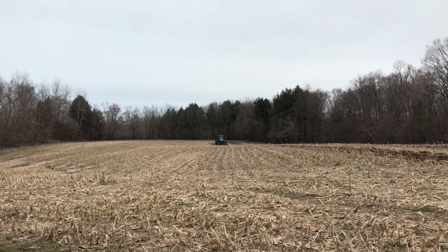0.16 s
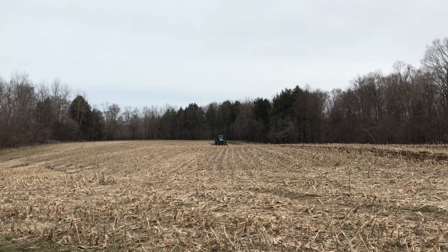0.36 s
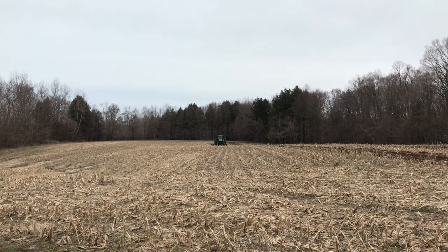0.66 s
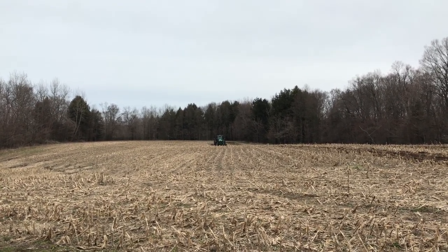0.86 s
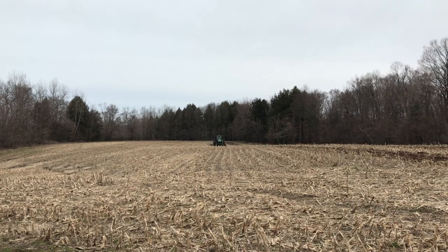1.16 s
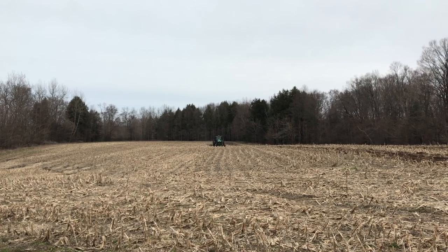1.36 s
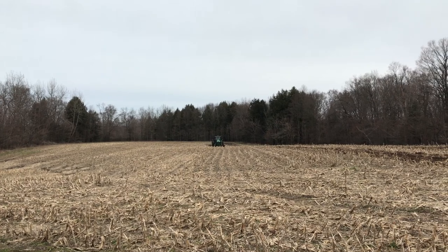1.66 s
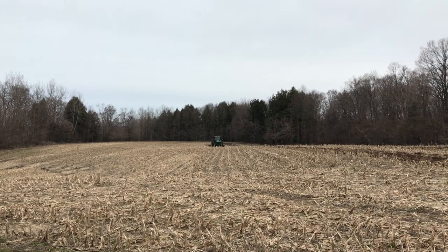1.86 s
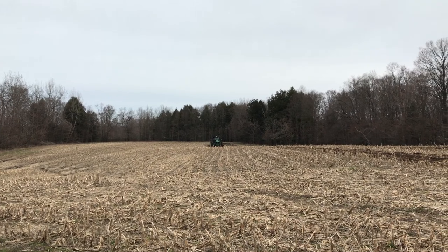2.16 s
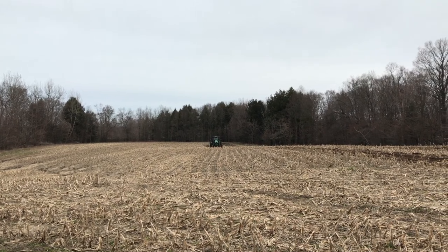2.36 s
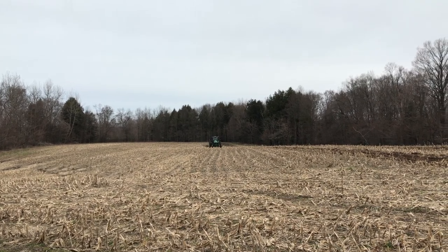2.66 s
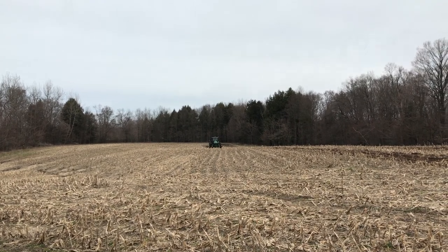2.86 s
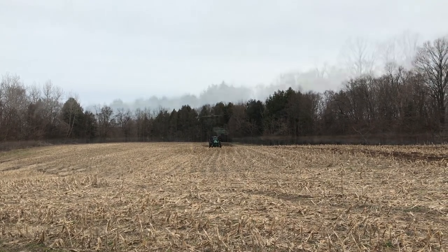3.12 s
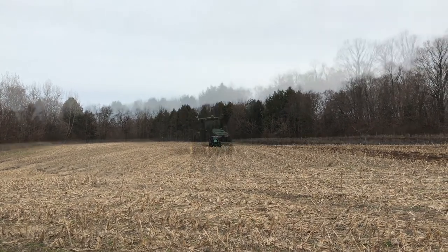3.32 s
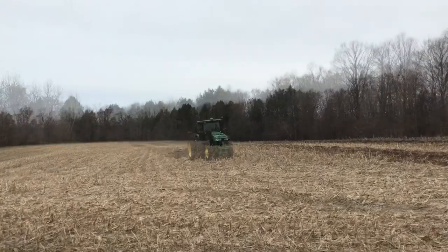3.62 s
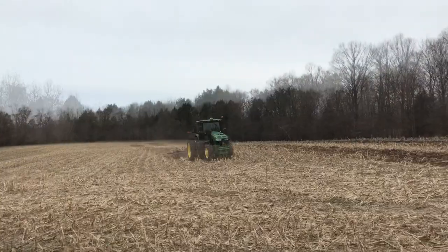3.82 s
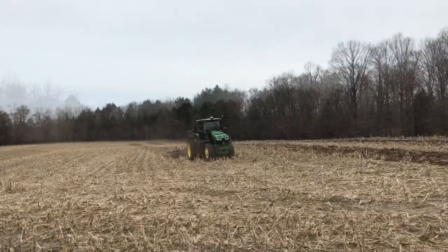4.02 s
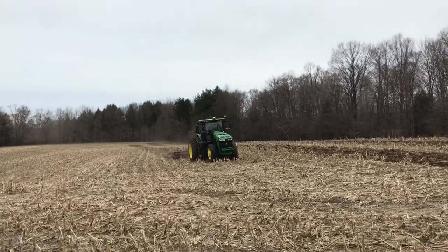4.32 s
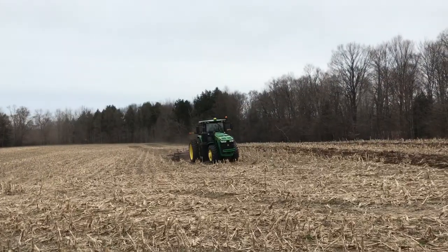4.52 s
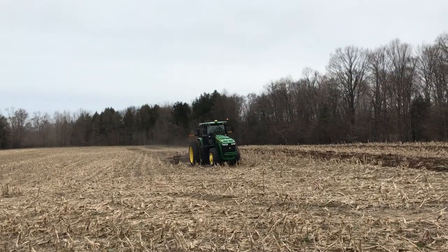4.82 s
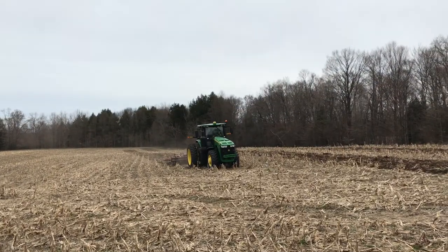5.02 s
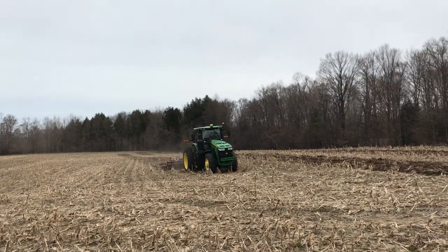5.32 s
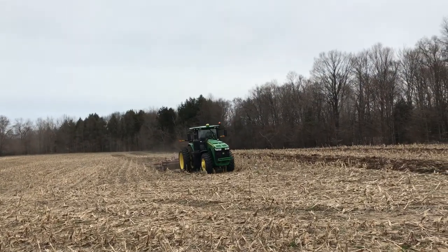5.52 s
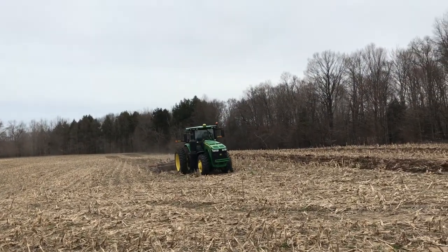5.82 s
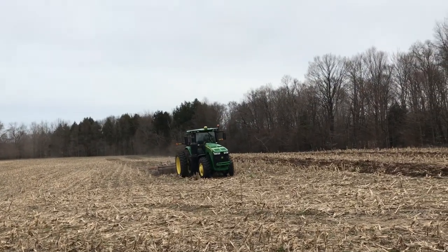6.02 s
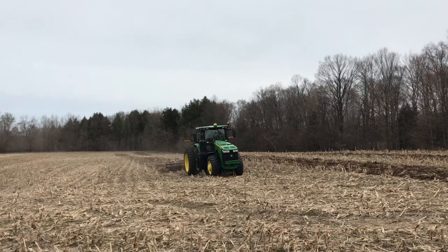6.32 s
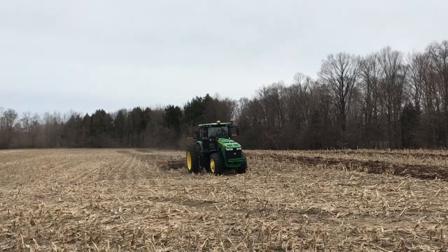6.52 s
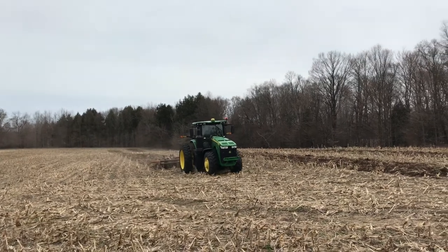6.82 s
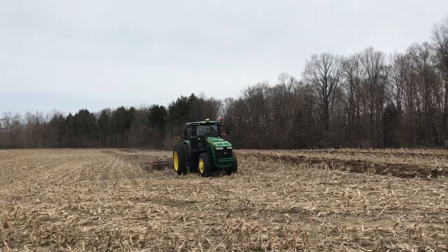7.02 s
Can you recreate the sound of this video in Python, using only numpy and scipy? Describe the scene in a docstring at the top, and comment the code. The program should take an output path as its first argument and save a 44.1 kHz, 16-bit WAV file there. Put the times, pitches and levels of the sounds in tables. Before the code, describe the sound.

A distant diesel tractor pulling a plough drones steadily, its fan hum clearest, its muffled clatter slowly emerging. Then a smooth dissolve of over a second brings a strong nearby engine at slightly higher speed, rumbling, rattling and pulsing about five times a second. Dry crackles and sharp little snaps come from stubble by the microphone, mainly during the dissolve and just before the end. No echo, just open air.

```python
"""Fan hum and a low exhaust rumble carry across an open field, then dissolve into the same kind of sound close by.
A six-cylinder diesel tractor pulls a plough through corn stubble and drives at the microphone.
Hum and engine tones are sines locked to the crank; close by, the hum beats against the fifth crank order.
Rumble and clatter are coloured noise, and part of the clatter repeats every two crank turns.
Near the microphone dry stalks rustle as tiny random cracks and snap as short swells of bright noise."""
import sys
import numpy as np
from scipy.fft import rfft, irfft
from scipy.io import wavfile
from scipy.ndimage import map_coordinates

SR = 44100
rng = np.random.default_rng(int(sys.argv[2]) if len(sys.argv) > 2 else 0)


def to_wav(sig):
    """Store sig (one row per channel, or 1-D mono) as 16-bit WAV at the path in sys.argv[1].

    Samples outside -1..1 are clipped; the rate is SR.
    """
    pcm = np.clip(np.atleast_2d(sig), -1, 1) * 32767
    pcm = np.round(pcm).astype(np.int16)
    wavfile.write(sys.argv[1], SR, pcm.T)  # frames by channels


N = 316638
TIME = np.arange(N) / SR
BINS = np.maximum(np.arange(N // 2 + 1) * SR / N, 1)   # Hz
DISSOLVE_AT_S, DISSOLVE_S = 2.875, 1.4   # the far sound gives way to the near one


def from_db(db):
    """Decibels to gain."""
    return 10 ** (np.asarray(db) / 20)


def rms_one(x):
    """Scale to unit power."""
    return x / np.sqrt(np.mean(x ** 2) + 1e-20)


def drift(rate):
    """Slow random wander of spread 1 that changes about rate times a second."""
    smooth = 1 / (1 + (BINS / rate) ** 2)
    return rms_one(irfft(rfft(rng.standard_normal(N)) * smooth, N))


def coloured(white, spectrum):
    """Give a white signal of unit power a spectrum of (frequency [Hz], density [dB per Hz])."""
    hz, db = np.transpose(spectrum)
    density_db = np.interp(np.log(BINS), np.log(hz), db)
    gain = from_db(density_db) * np.sqrt(SR / 2)   # unit power is spread over SR / 2 Hz
    return irfft(rfft(white) * gain, N)


def shaped(x, bells):
    """Raise or lower narrow bands, given as (frequency [Hz], width [Hz], gain [dB])."""
    gain_db = sum(db / (1 + (2 * (BINS - hz) / width) ** 2) for hz, width, db in bells)
    return irfft(rfft(x) * from_db(gain_db), N)


def swell(centre_s, width_s):
    """A smooth bell-shaped rise and fall of height 1 around a moment."""
    widths_away = (TIME - centre_s) / width_s
    return np.exp(-0.5 * np.minimum(widths_away ** 2, 100))


def tone(cycles):
    """A sine of unit power."""
    return np.sqrt(2) * np.cos(2 * np.pi * cycles)


def crank_turns(speed_curve):
    """Engine speed summed to crank angle in turns, zero at the moment when fan and crank are in step."""
    in_step_s = 5.03
    seconds, rpm = np.transpose(speed_curve)
    turns = np.cumsum(np.interp(TIME, seconds, rpm)) / SR / 60
    return turns - np.interp(in_step_s, TIME, turns)


def fan(turns, blades_per_turn, harmonics, flutter_db):
    """Passing blades hum at a fixed ratio to the crank, in sines whose common level flutters."""
    hum = sum(from_db(db) * tone(k * blades_per_turn * turns) for k, db in harmonics.items())
    return from_db(flutter_db * drift(6.0)) * hum


def engine_tones(turns, orders, jitter_turns, fade_db):
    """Crank orders; uneven running blurs the high ones, and moving air fades each on its own."""
    uneven_turns = turns + jitter_turns * drift(3.8)
    return sum(from_db(db + fade_db * drift(2.1)) * tone(order * uneven_turns)
               for order, db in orders.items())


def clatter(turns, spectrum, repeat_share, firing_depth):
    """The same knocks return every two crank turns, amid fresh noise that swells with each firing."""
    cycle = rng.standard_normal(int(2 * N / (turns[-1] - turns[0])))
    place_in_cycle = turns / 2 % 1 * len(cycle)
    knocks = rms_one(map_coordinates(cycle, [place_in_cycle], order=3, mode="grid-wrap"))
    firing = np.cos(2 * np.pi * 3 * turns)   # three cylinders fire in each turn
    fresh = rms_one(rng.standard_normal(N) * (1 + firing_depth * firing))
    # the knocks ring in the block's range; share is their part of the power in each band
    block_range = np.interp(BINS, [600, 1500, 3500, 7000], [0, 1, 1, 0])
    share = np.clip(repeat_share * block_range, 0, 1)
    mixed = np.sqrt(share) * rfft(knocks) + np.sqrt(1 - share) * rfft(fresh)
    return coloured(irfft(mixed, N), spectrum)


def far_tractor():
    """Across the field the fan hum carries best, engine tones come and go, and clatter slowly comes through."""
    # engine speed under the drag of the plough: (time [s], speed [revolutions per minute])
    far_rpm = [(0.0, 1909), (0.4, 1951), (0.62, 1934), (1.32, 1932), (1.68, 1897), (2.12, 1930),
               (2.56, 1886), (2.73, 1909), (3.4, 1936)]
    # fan hum before trim: {multiple of the blade rate: level [dB rms]}
    far_fan = {1: -35, 3: -75, 4: -65.5}
    # engine tones before trim and fading: {order [cycles per crank turn]: level [dB rms]}
    far_orders = {1.5: -65, 2: -62, 2.5: -58, 3: -53, 6: -57, 7: -62, 12: -74, 16: -72, 18: -64, 24: -62,
                  28.85: -63, 35.5: -68, 45: -70, 48: -68}
    # exhaust and tyre rumble before trim: (frequency [Hz], density [dB per Hz])
    far_rumble = [(15, -107), (30, -90), (50, -76), (85, -65.5), (130, -65.5), (205, -65.5), (250, -76),
                  (300, -86.5), (600, -105), (3000, -160)]
    # injectors, valves and gears, dulled by air and ground, before trim: (frequency [Hz], density [dB per Hz])
    far_clatter = [(150, -105), (330, -89.5), (520, -86.5), (620, -79.5), (900, -79), (1300, -77),
                   (1700, -82), (2350, -82), (2900, -91.5), (3900, -92), (5600, -103), (7000, -110),
                   (8500, -122), (16000, -145)]
    low_trim_db, tones_trim_db = 0.03, 0.5
    clatter_start_db, clearing_db_per_s = -1.97, 0.96

    turns = crank_turns(far_rpm)
    hum = fan(turns, 4.885, far_fan, flutter_db=0.64)   # blades per crank turn
    rumble = coloured(rng.standard_normal(N), far_rumble)
    knocking = clatter(turns, far_clatter, repeat_share=0.058, firing_depth=0.02)
    block = knocking * from_db(0.5 * drift(5))
    tones = engine_tones(turns, far_orders, jitter_turns=0.0019, fade_db=3.0)
    low = from_db(low_trim_db) * (hum + rumble)
    clearing = from_db(clatter_start_db + clearing_db_per_s * TIME)
    return low + clearing * block + from_db(tones_trim_db) * tones


def stubble(grains_per_s, size_spread_db, clump_db):
    """Dry stalks rustle in tiny random cracks, which swell when a whole clump crumples."""
    # spectrum of the rustle before its trim: (frequency [Hz], density [dB per Hz])
    stalk_spectrum = [(1500, -112), (4000, -83), (6000, -81), (8500, -84), (12500, -91), (16000, -99)]
    # clumps that crumple: (time [s], power added relative to the steady rustle [dB], bell width [s])
    crunches = [(3.3, 1, .05), (3.587, 7.5, 0.026), (3.782, 7.5, 0.042), (3.927, 5, 0.041), (4.35, 3, 0.21),
                (6.81, 6.5, 0.019), (6.91, 6.5, 0.053)]
    rustle_trim_db = -2

    born = rng.random(N) < grains_per_s / SR
    size_db = size_spread_db * np.minimum(rng.exponential(1, N), 4)
    grains = born * from_db(size_db) * rng.standard_normal(N)
    added_power = sum((from_db(db) * swell(s, width_s)) ** 2 for s, db, width_s in crunches)
    crushing = np.sqrt(1 + added_power)
    level = from_db(rustle_trim_db + clump_db * drift(28))
    return coloured(rms_one(grains) * crushing * level, stalk_spectrum)


def snaps():
    """Fibres of a stalk give way in a quick, bright swell of noise; small ones snap at random."""
    # a snapping stalk at 0 dB: (frequency [Hz], density [dB per Hz])
    snap_spectrum = [(1500, -112), (4000, -86), (6000, -82.5), (8500, -86), (12500, -90), (16000, -95)]
    # stalks that snap outright: (time [s], peak level on the snap spectrum [dB], bell width [s])
    large = [(2.957, 13, .002), (3.25, 10, .003), (3.52, 16.5, .002), (3.58, 14, 0.0018), (3.73, 11, .004),
             (3.961, 11, .002), (4.087, 12, .002), (6.488, 6.5, .008), (6.588, 11, .004),
             (6.646, 10.5, .004), (6.794, 12.5, 0.0067), (6.8187, 22.5, 0.0013)]
    small_per_s, small_loudest_db, small_spread_db, small_width_s = 5.5, 3, 8, 0.0015

    draws = rng.random((int(small_per_s * TIME[-1]), 2))
    small = [(TIME[-1] * when, small_loudest_db - small_spread_db * size, small_width_s)
             for when, size in draws]
    tearing = sum(from_db(db) * swell(s, width_s) for s, db, width_s in large + small)
    return coloured(tearing * rng.standard_normal(N), snap_spectrum)


def near_tractor():
    """Close by, a faster engine with bright clatter grows as distance shrinks; fan and fifth order beat."""
    # engine speed under the drag of the plough: (time [s], speed [revolutions per minute])
    near_rpm = [(3.4, 2177), (3.68, 2114), (4.02, 2184), (4.27, 2138), (4.62, 2185), (4.8, 2145),
                (5.5, 2169), (6.45, 2173), (7.18, 2146)]
    # fan hum before trim and distance: {multiple of the blade rate: level [dB rms]}
    near_fan = {1: -23.5, 2: -52.5, 3: -47.5, 4: -54.5, 5: -47}
    # engine tones before trim, fading and distance: {order [cycles per crank turn]: level [dB rms]}
    near_orders = {1.5: -52.5, 2.5: -44.5, 5: -40, 6: -36.5, 10: -49, 12: -49.5, 18: -39, 20: -50, 25.5:
                   -53.5, 29: -49, 30: -43.5, 34: -50.5, 35.5: -47, 39.5: -50.5, 40.5: -53, 49.5: -50.5, 51:
                   -59, 61.5: -52, 63: -51, 91: -58}
    # exhaust and tyre rumble before trim and distance: (frequency [Hz], density [dB per Hz])
    near_rumble = [(15, -100), (30, -84), (55, -59.5), (75, -62.5), (95, -51), (150, -55), (240, -51),
                   (300, -67.5), (600, -118), (3000, -140)]
    # injectors, valves and gears before trim and distance: (frequency [Hz], density [dB per Hz])
    near_clatter = [(150, -95), (330, -65.5), (430, -67), (520, -60.5), (700, -59.5), (780, -68.5),
                    (880, -61), (1100, -59), (1450, -64), (1950, -65.5), (2350, -63.5), (2750, -70.5),
                    (3900, -70), (6000, -78), (16000, -95)]
    # resonances of the block and its covers: (frequency [Hz], width [Hz], gain [dB])
    block_rings = [(1070, 57, 3), (1280, 39, 2.5), (1440, 56, 3), (1786, 85, 3), (2245, 99, 2),
                   (3293, 41, 5), (3850, 160, 2.5)]
    start_distance_m, speed_m_per_s = 31.3, 1.98   # distance when the dissolve starts
    hum_trim_db, engine_trim_db, block_trim_db = -1.5, -1.35, -0.95
    rumble_trim_db, rumble_rise_db_per_s = -2, 0.24   # the rumble gains a little faster than the rest

    turns = crank_turns(near_rpm)
    driven_s = TIME - DISSOLVE_AT_S
    # just under five blades per crank turn: about five beats a second against the fifth order
    hum = from_db(hum_trim_db) * fan(turns, 4.8614, near_fan, flutter_db=0.54)
    rumble_gain = from_db(rumble_trim_db + rumble_rise_db_per_s * driven_s)
    rumble = rumble_gain * coloured(rng.standard_normal(N), near_rumble)
    knocking = clatter(turns, near_clatter, repeat_share=0.26, firing_depth=0.04)
    block = shaped(knocking, block_rings) * from_db(block_trim_db + 0.45 * drift(7))
    tones = engine_tones(turns, near_orders, jitter_turns=0.00089, fade_db=1.2)
    engine = from_db(engine_trim_db) * (block + tones)
    distance_m = np.maximum(start_distance_m - speed_m_per_s * driven_s, 1)
    return start_distance_m / distance_m * (hum + rumble + engine)


def dissolve():
    """Gains of the far and the near sound: one fades out as the other fades in."""
    fade_out_bend, fade_in_bend = 0.78, 1   # 1 is a straight fade
    part = np.clip((TIME - DISSOLVE_AT_S) / DISSOLVE_S, 0, 1)
    return (1 - part) ** fade_out_bend, part ** fade_in_bend


def scene():
    """The open field: no walls, only the tractor and the stubble."""
    far_gain, near_gain = dissolve()
    far = far_tractor()
    rustle = stubble(grains_per_s=9800, size_spread_db=3.5, clump_db=2.2)
    close_by = rustle + snaps() + near_tractor()
    return (far_gain * far + near_gain * close_by)[None]


def record(dry):
    """A small microphone adds its hiss, its port cancels narrow bands, and the top is cut."""
    # hiss before the port dips: (frequency [Hz], density [dB per Hz])
    mic_hiss = [(3000, -125), (9000, -117), (9400, -114.5), (10000, -117), (13000, -115), (13600, -116),
                (14100, -108.5), (14600, -116.5), (16000, -120)]
    # narrow bands that the port weakens: (frequency [Hz], width [Hz], gain [dB])
    port_dips = [(4880, 740, -4.5), (7570, 1230, -4.5), (10450, 740, -5.5)]
    cutoff_hz = 15800

    hiss = coloured(rng.standard_normal(N), mic_hiss)
    heard = shaped(dry + hiss, port_dips)
    low_pass = 1 / np.sqrt(1 + (BINS / cutoff_hz) ** 300)   # very steep
    return irfft(rfft(heard) * low_pass, N)


dry = scene()
out = record(dry)
to_wav(out)
```